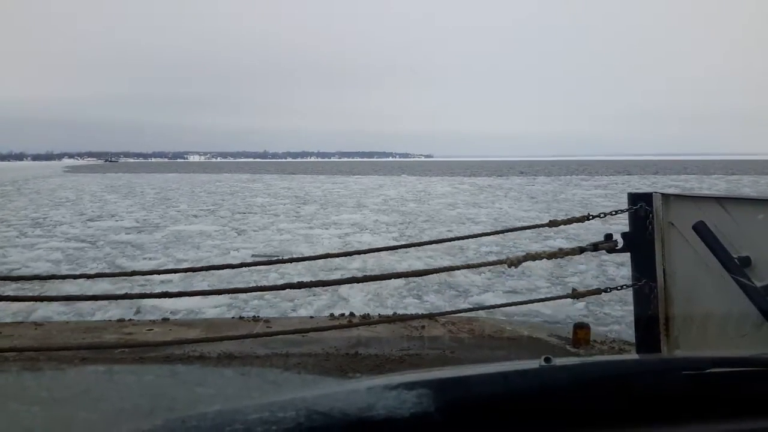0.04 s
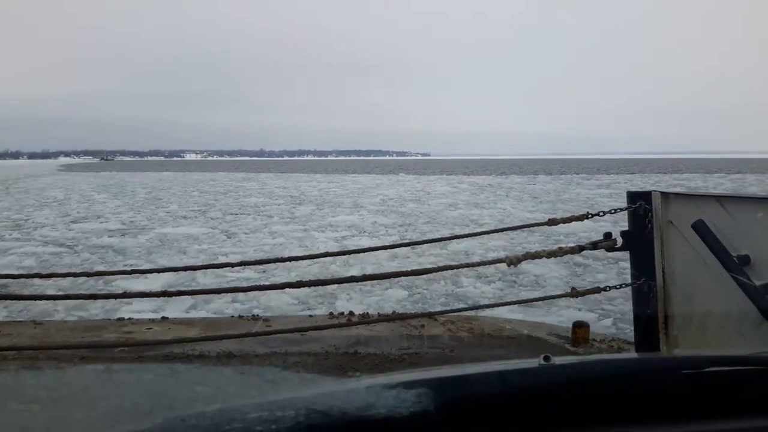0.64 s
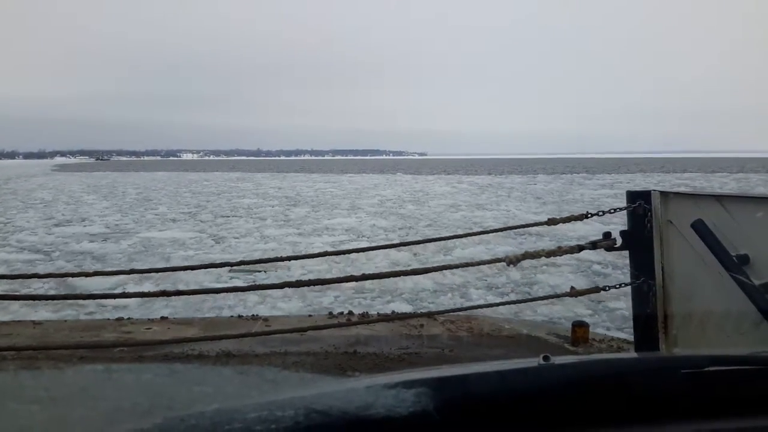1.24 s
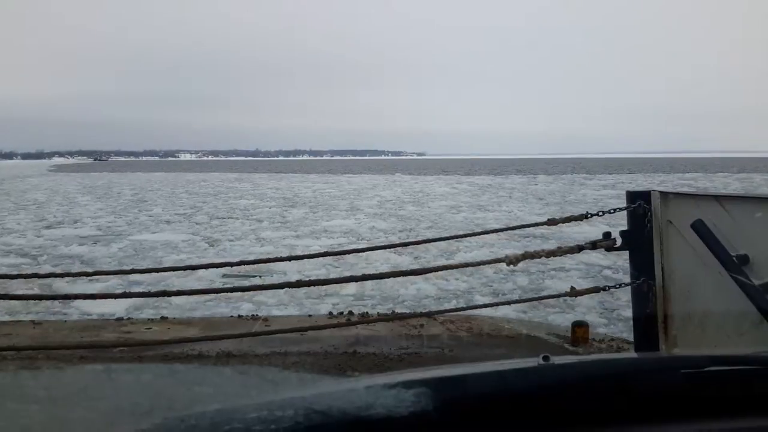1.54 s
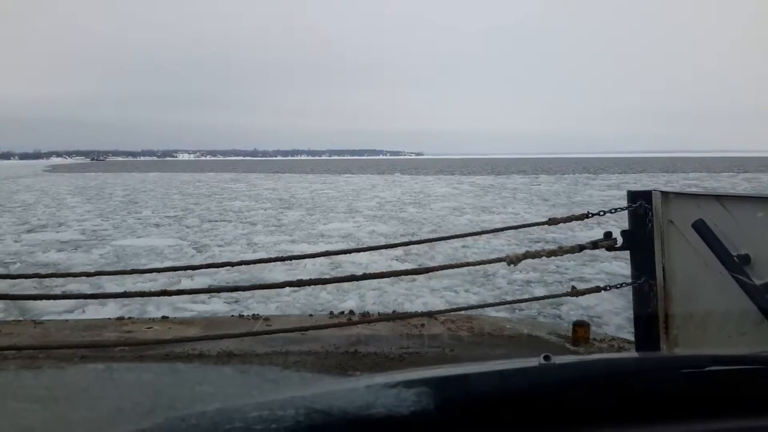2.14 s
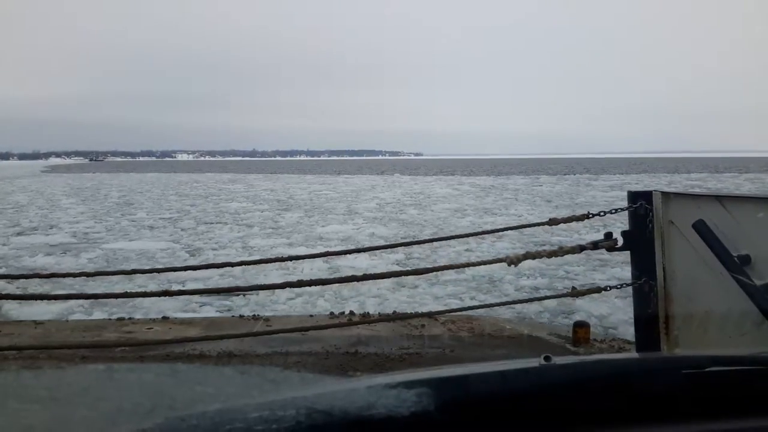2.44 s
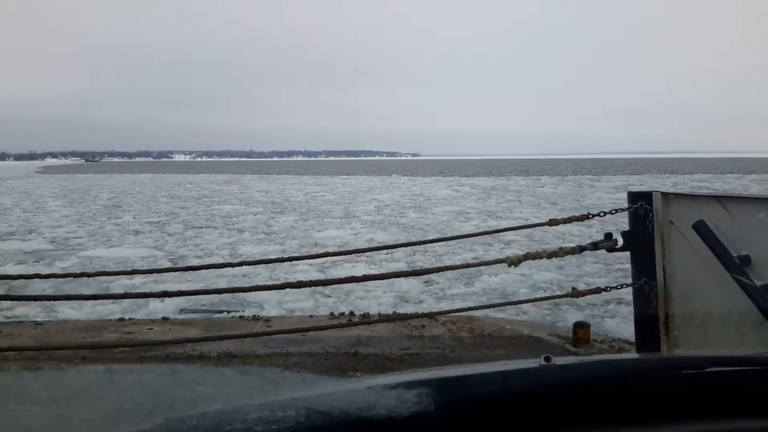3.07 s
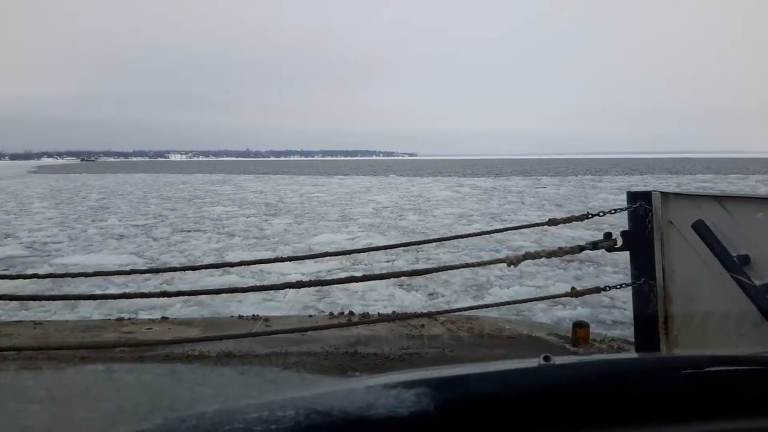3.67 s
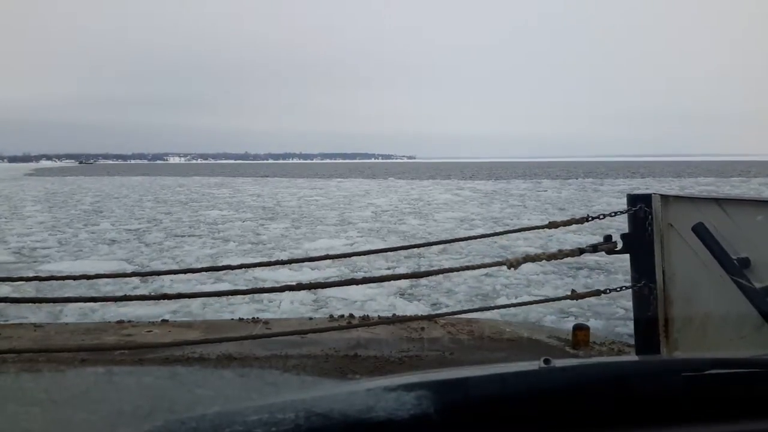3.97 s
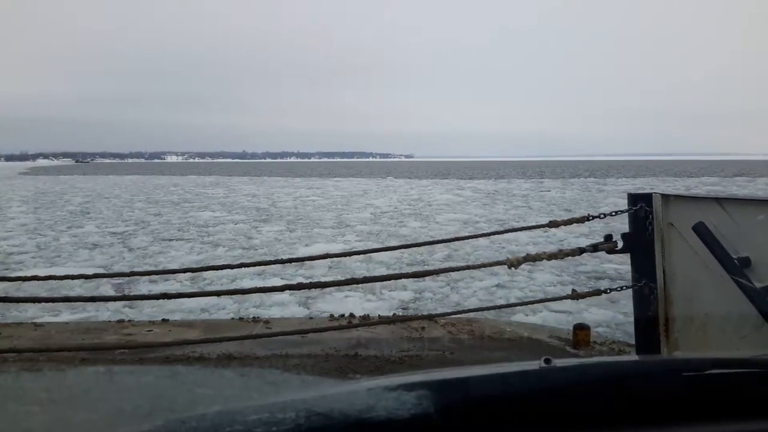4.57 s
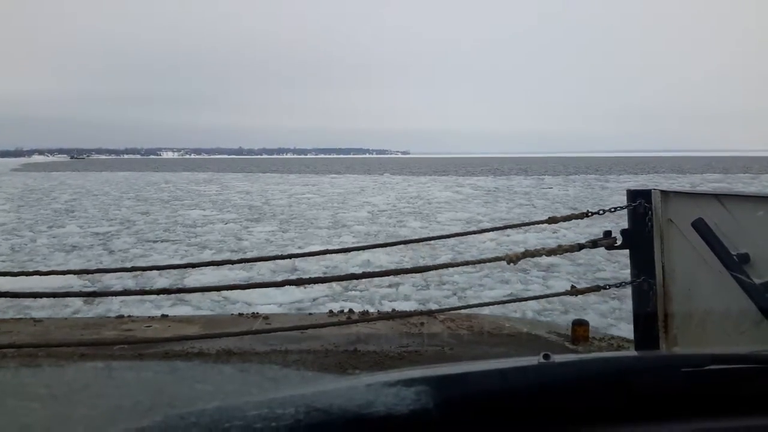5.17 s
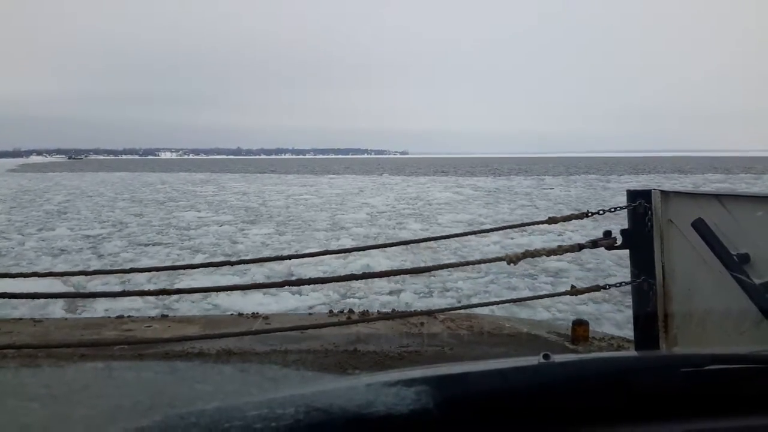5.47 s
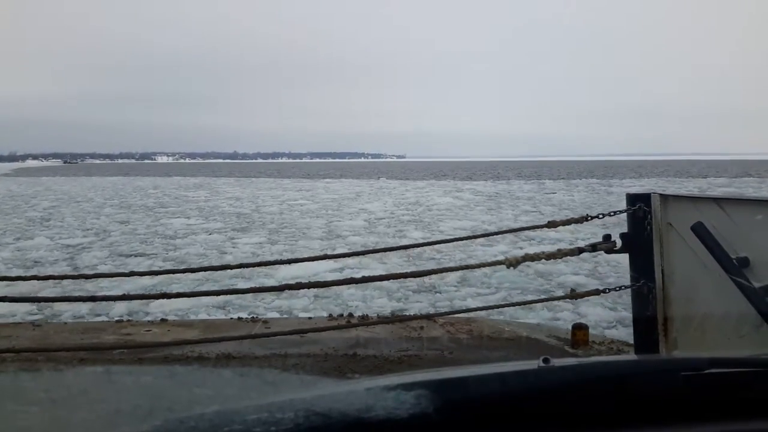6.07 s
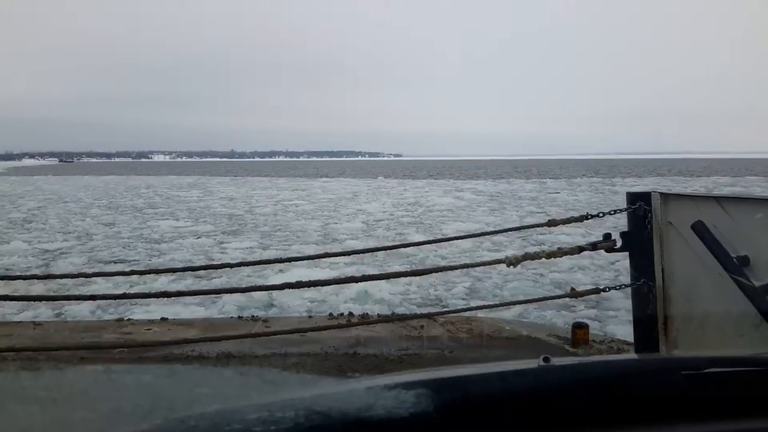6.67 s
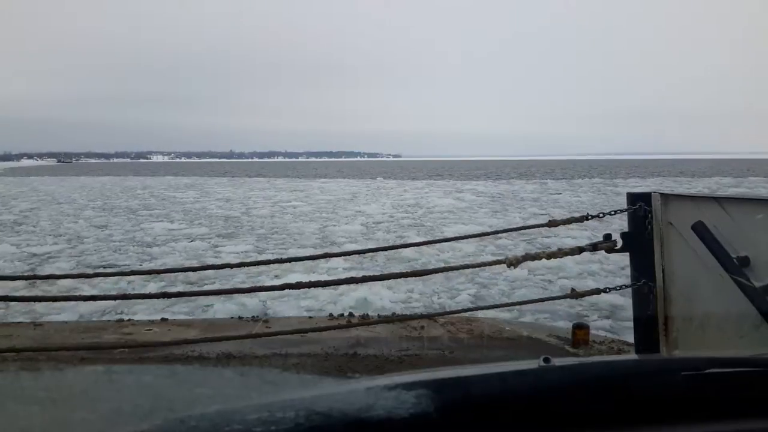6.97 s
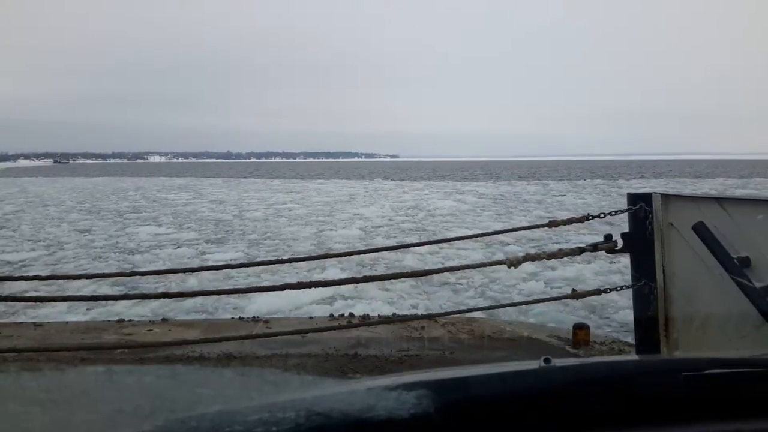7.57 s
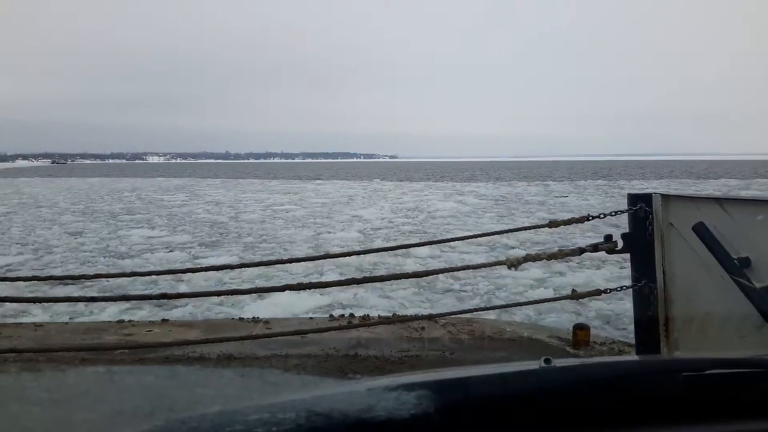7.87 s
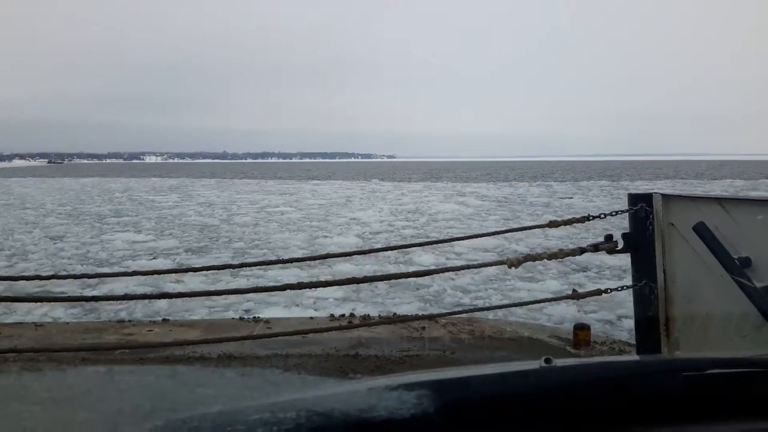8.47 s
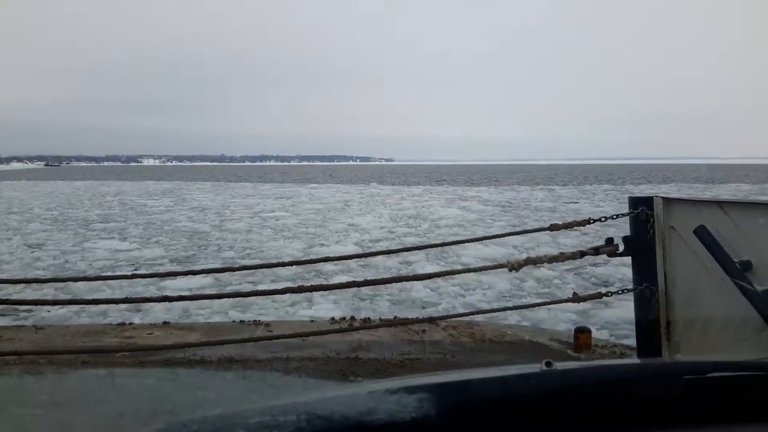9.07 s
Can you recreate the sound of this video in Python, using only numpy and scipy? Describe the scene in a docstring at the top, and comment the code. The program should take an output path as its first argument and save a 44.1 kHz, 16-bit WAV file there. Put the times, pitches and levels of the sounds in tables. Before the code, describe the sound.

From inside a car on a ferry's deck, a low diesel drone shakes the hull, swelling into heavy booms when the propeller works hard. Quieter, muffled ice sloshes and crunches the whole time. Short scrapes and small cracks against the bow cluster in the first third, thin out, then return in the second half as the engine throbs hardest. A faint high hiss occasionally rises to a fizz.

```python
"""A car ferry's diesel drive booms and throbs as it pushes through broken ice, heard in a car on deck.
The engine's firings shake the steel hull, and the boom surges when the propeller works hard.
Floating slabs of ice (floes) churn in the water, scrape along the bow and crack, dulled by the
car windows. A thin, high hiss lies on top and swells a few times."""
import sys
import numpy as np
from scipy import signal
from scipy.fft import rfft, irfft, next_fast_len
from scipy.io import wavfile
from scipy.ndimage import uniform_filter1d

SR = 44100
rng = np.random.default_rng(int(sys.argv[2]) if len(sys.argv) > 2 else 0)


def store_wav(level_fs):
    """Save 16-bit WAV to argv[1]."""
    pcm = np.round(np.clip(np.atleast_2d(level_fs), -1, 1) * 32767)
    wavfile.write(sys.argv[1], SR, pcm.T.astype(np.int16))


N = 411012
T = np.arange(N) / SR


def gain(db):
    """Turn decibels into a number to multiply a sound by."""
    return 10 ** (np.asarray(db) / 20)


def normalise(x):
    """Scale a signal to an average strength (rms) of 1."""
    return x / np.sqrt(np.mean(x ** 2))


def curve(points):
    """Join (time_s, value) points with straight lines."""
    return np.interp(T, *np.transpose(points))


def bump(middle_s, length_s):
    """Rise smoothly to 1 at a chosen moment, then fall again."""
    return np.exp(-2 * np.minimum(((T - middle_s) / length_s) ** 2, 20))


def wobble(per_s):
    """Drift smoothly between random values, mostly from -1 to 1."""
    step = int(SR / per_s)
    held = np.repeat(rng.standard_normal(N // step + 1), step)
    return normalise(uniform_filter1d(uniform_filter1d(held, step), step)[:N])


def clicks(per_s, spread_db):
    """Tiny hits at random times, most weak and a few strong."""
    strength = gain(spread_db * np.minimum(rng.exponential(size=N), 5))
    hits = rng.random(N) < per_s / SR
    return normalise(hits * strength * rng.choice([-1, 1], N))


def shape_tone(x, tone):
    """Turn each pitch up or down by a (pitch_hz, level_db) table; the result has strength 1."""
    pitch_hz, level_db = np.transpose(tone)
    size = next_fast_len(N)
    hz = np.maximum(np.arange(size // 2 + 1) * SR / size, 1)
    octaves_outside = np.maximum(np.log2(hz / pitch_hz[-1]), 0) + np.maximum(np.log2(pitch_hz[0] / hz), 0)
    change_db = np.interp(np.log(hz), np.log(pitch_hz), level_db) - 40 * octaves_outside
    return normalise(irfft(rfft(x, size) * gain(change_db), size)[:N])


def resonate(x, pitch_hz, sharpness=1.4):
    """Keep a broad band around one pitch, filtering twice; the result has strength 1."""
    b, a = signal.iirpeak(pitch_hz, sharpness, fs=SR)
    return normalise(signal.lfilter(np.convolve(b, b), np.convolve(a, a), x))


# the tone of the whistling hiss, of its fizz and of a wider fizz: pitch_hz, level_db
WHISTLE_TONE = [(3300, -13.5), (4000, -15), (4400, -20.5), (4850, -14.5), (5500, -34), (6100, -23.5),
                (7000, -19), (7600, -13), (8000, -0.5), (8250, 2.5), (8600, -6.5), (9100, -8.5),
                (9700, -17), (10300, -15.5), (11200, -30), (14000, -23.5)]
FIZZ_TONE = [(5800, -30), (7000, -14), (7800, 4.5), (8500, 11.5), (9000, 1.5), (9600, -9), (10400, -7),
             (11200, -32.5), (12500, -35)]
WIDE_FIZZ_TONE = [(6300, -26), (7200, -7), (7900, 2), (9100, 0.5), (9800, -8), (10700, -12), (11500, -24)]
# how loud the whistling hiss is: time_s, level_db
WHISTLE_LEVELS = [(0, -64), (.85, -64.5), (2, -64.5), (2.7, -65), (3.5, -66.5), (4.5, -65), (6.2, -65.5),
                  (6.75, -66.3), (7.4, -65.2), (8.35, -66.5), (8.9, -64.8), (9.32, -66)]
# moments when the hiss swells: middle_s, length_s, level_db, wide_share_db
FIZZ_SWELLS = [(.32, .09, -67, -13), (2.27, 0.24, -58.5, -10), (4.74, 0.17, -57.5, -10),
               (4.978, 0.13, -61.5, -7), (5.3, 0.29, -60.5, -3.5), (5.553, 0.16, -66.5, -4),
               (7.33, .15, -65, -14)]


def hiss(ragged_db=0.7):
    """A thin, whistling hiss broadens into a ragged fizz when it swells."""
    whistle = shape_tone(rng.standard_normal(N), WHISTLE_TONE)
    whistle *= gain(curve(WHISTLE_LEVELS) + 0.35 * wobble(9.2))
    fizz = shape_tone(clicks(per_s=7800, spread_db=2.5), FIZZ_TONE)
    wide_fizz = shape_tone(clicks(per_s=7800, spread_db=2.0), WIDE_FIZZ_TONE)
    swells = sum(gain(level_db) * bump(middle_s, length_s) * (fizz + gain(wide_share_db) * wide_fizz)
                 for middle_s, length_s, level_db, wide_share_db in FIZZ_SWELLS)
    return whistle + swells * gain(ragged_db * wobble(25))


# the notes of the steel plates at the ship's front: pitch_hz, width_hz, level_db
PLATE_NOTES = [(347.7, 9.1, -7), (379.7, 9.2, -5.5), (480.5, 12, -8), (590, 34, -9.5), (738, 16, -5),
               (866, 39, -7.5), (944, 34, -7.5), (1007, 25, -5.5), (1110, 24, -8.5)]


def bow_plates(push):
    """Ice rubs the steel plates, and they add their ringing to its sound."""
    ringing = np.zeros(N)
    for pitch_hz, width_hz, level_db in PLATE_NOTES:
        b, a = signal.iirpeak(pitch_hz, pitch_hz / width_hz, fs=SR)
        ringing += gain(level_db) * signal.lfilter(b, a, push)
    return push + ringing


# the tone of churning water and of crunching ice, heard through glass: pitch_hz, level_db
CHURN_TONE = [(150, -17.5), (270, -3), (320, -1.5), (365, 0), (440, -6), (540, -8), (680, -12), (800, -15),
              (1020, -16.5), (1280, -17), (1600, -30.5), (2000, -42), (3000, -60.5)]
CRUNCH_TONE = [(700, -11.5), (1400, 3), (1850, -2.5), (2100, 1), (2380, 2), (2700, -3.5), (3000, -6.5),
               (3600, -19.5), (4000, -24.5), (4400, -30), (4850, -26.5), (5500, -44), (7000, -32),
               (14000, -45)]
# floes rolling over in the bow wave, and lulls between them: middle_s, length_s, change_db
ROLLS_AND_LULLS = [(0.102, 0.17, 2.3), (.38, .14, -1.7), (.8, 0.11, -2), (1.01, .12, .5), (2.6, .45, 0.2),
                   (4.63, .33, 1.3), (5.002, .053, 1), (5.3, 0.065, 1), (5.643, .099, 2.5),
                   (5.85, .15, -0.5), (6.411, .09, 1.5), (6.8, .09, -0.5), (7.33, 0.17, 2),
                   (7.738, .12, -2.6), (7.979, 0.16, 2.4), (8.42, .1, -2), (8.869, 0.11, -0.8)]


def churning_ice(churn_fade_db_per_s=0.3144, crunch_fade_db_per_s=0.42):
    """Floes jostle in the water and their edges crumble; both sounds fade slowly as the ice thins."""
    roll_db = sum(change_db * bump(middle_s, length_s) for middle_s, length_s, change_db in ROLLS_AND_LULLS)
    roll_db += 0.3 * wobble(5.5)
    churn_db = -35.5 - churn_fade_db_per_s * T + roll_db + 0.57 * wobble(18)
    crunch_db = -54 - crunch_fade_db_per_s * T + 0.5 * roll_db + 0.75 * wobble(22)
    jostle = clicks(per_s=1500, spread_db=1.0) + rng.standard_normal(N)
    crumble = clicks(per_s=1400, spread_db=1.1) * gain(1.1 * wobble(30)) + rng.standard_normal(N)
    churn = shape_tone(bow_plates(jostle), CHURN_TONE) * gain(churn_db)
    crunch = shape_tone(crumble, CRUNCH_TONE) * gain(crunch_db)
    return churn + crunch


# the tone of a hard ice edge rasping on steel: pitch_hz, level_db
RASP_TONE = [(900, -4), (1400, 0.5), (1850, -6), (2350, 6), (2800, -4), (3600, -20.5), (5000, -31.5)]
# floes scraping the bow: middle_s, length_s, level_db, pitch_hz, rasp_share_db
FLOE_SCRAPES = [(0.133, 0.12, -49, 1160, -9), (.6, .06, -52, 1100, -9), (1.03, .09, -45.5, 890, -14),
                (1.15, 0.056, -55.5, 1400, -1), (1.354, 0.049, -54.5, 1460, 0),
                (1.69, .085, -43, 980, -6.5), (1.86, .1, -44, 720, -11), (2.2, .097, -54, 1190, -13),
                (2.718, .13, -58, 1490, -8.5), (2.92, 0.068, -52, 1150, -8), (4.313, .06, -49, 1050, -11),
                (4.37, .08, -40, 320, -26), (4.5, .15, -56, 1350, -5.5), (4.7, .2, -54, 1080, -9),
                (5.637, 0.12, -51.5, 1140, -5), (6.18, .07, -49.5, 1080, -11), (6.33, .08, -42, 950, -19),
                (6.41, .06, -38, 470, -26), (6.995, .1, -49.5, 1098, -9), (7.248, .052, -41, 694, -17),
                (7.392, .09, -55, 1400, -5.5), (7.941, .087, -50, 1000, -6), (8.13, .18, -41, 350, -26),
                (8.198, 0.046, -55, 1000, -13), (8.652, 0.047, -52.5, 1290, -12),
                (8.98, .12, -58, 1370, -6)]


def scraping_ice():
    """A floe sticks and slips along the plates. Its size sets the pitch; hard edges add a bright rasp."""
    slips = clicks(per_s=1500, spread_db=1.0)
    ringing = bow_plates(slips)
    rasp = shape_tone(slips, RASP_TONE)
    out = np.zeros(N)
    for middle_s, length_s, level_db, pitch_hz, rasp_share_db in FLOE_SCRAPES:
        grinding = resonate(ringing, pitch_hz) + gain(rasp_share_db) * rasp
        out += gain(level_db) * bump(middle_s, length_s) * grinding
    return out


# slabs breaking against the hull: start_s, fade_s, level_db, pitch_hz
SLAB_CRACKS = [(.205, .02, -52, 2300), (.915, .028, -55, 2600), (.947, .022, -44, 900),
               (1.052, .025, -41, 750), (1.124, .035, -54, 2600), (1.335, .022, -53, 2500),
               (1.37, .013, -54, 2170), (1.662, .05, -50, 2250), (1.674, .04, -40, 980),
               (1.812, 0.022, -53, 2200), (2.14, .022, -51.5, 2500), (2.5, 0.033, -51, 2300),
               (2.655, .022, -52, 2500), (2.775, .033, -53, 1790), (2.878, 0.016, -49, 2400),
               (5.595, .02, -53, 2300), (5.652, .03, -55, 1990), (6.868, .015, -52.5, 2510),
               (7.205, .019, -54, 2700), (7.312, .025, -54, 2003), (7.905, .04, -48, 850),
               (7.98, 0.023, -54, 2590), (8.128, 0.011, -43, 1000), (9.157, .012, -51, 2590),
               (9.175, .02, -47, 1006)]


def cracking_ice(rise_s=0.003):
    """A slab snaps in a quick run of tiny breaks that dies away; big slabs sound low."""
    breaks = clicks(per_s=2000, spread_db=1.0)
    out = np.zeros(N)
    for start_s, fade_s, level_db, pitch_hz in SLAB_CRACKS:
        span = (T >= start_s) & (T < start_s + 10 * fade_s)
        age_s = T[span] - start_s
        loudness = np.minimum(age_s / rise_s, np.exp((rise_s - age_s) / fade_s))
        out[span] += gain(level_db) * loudness * resonate(breaks[span], pitch_hz)
    return out


def car_windows(x, cutoff_hz=2850):
    """The glass lets low sounds in and blocks high ones."""
    return signal.sosfilt(signal.butter(10, cutoff_hz, fs=SR, output="sos"), x)


# the diesel engine's hums: pitch_hz, level_db, drift_hz
ENGINE_HUMS = [(60.4, -42, 0.23), (96.7, -41, 1.8), (130.4, -39.5, 2.2), (151, -40.5, 1.8), (316, -53, 1.5)]


def engine_hum(waver_db=2.0):
    """The engine's lowest hum nearly holds its pitch while the higher ones drift; all waver in loudness."""
    out = np.zeros(N)
    for pitch_hz, level_db, drift_hz in ENGINE_HUMS:
        turns = rng.random() + np.cumsum(pitch_hz + drift_hz * wobble(7)) / SR
        out += np.sqrt(2) * gain(level_db + waver_db * wobble(12)) * np.sin(2 * np.pi * turns)
    return out


def diesel_knocks(cylinders=12, cycles_per_s=10.07, uneven_db=3, scatter_db=0.4):
    """The cylinders fire in turn, some harder than others, in a pattern that repeats every cycle."""
    firings_per_s = cylinders * cycles_per_s * (1 + 0.002 * wobble(1.5))
    firings_so_far = np.floor(np.cumsum(firings_per_s) / SR)
    fire_at = np.flatnonzero(np.diff(firings_so_far))
    cylinder_db = uneven_db * normalise(rng.standard_normal(cylinders))
    pattern_db = cylinder_db[np.arange(len(fire_at)) % cylinders]
    force = gain(pattern_db + scatter_db * rng.standard_normal(len(fire_at)))
    knocks = np.zeros(N)
    knocks[fire_at] = force - force.mean()  # only the unevenness rocks the engine's mounts
    return normalise(knocks)


# how well the hull and the car body pass each pitch: pitch_hz, level_db
HULL_TONE = [(20, -43.5), (35, -28), (52, -19), (66, -4), (77, -6.5), (83, 0), (93, -11.5), (106, 0.5),
             (130, 3.5), (160, -4), (190, -5.5), (200, -10), (218, -7), (250, -8), (285, -18), (450, -32.5)]
# the rumble from the slowly changing load on the hull: time_s, level_db
RUMBLE_LEVELS = [(0, -25), (2.05, -26.5), (2.6, -22.5), (3.25, -27), (4.5, -26.3), (5.2, -27.4),
                 (6.7, -27.6), (9.32, -28)]
# floes shoving the hull: middle_s, length_s, level_db
FLOE_SHOVES = [(.58, 0.14, -28.5), (.83, 0.037, -24.5), (1.1, .056, -23.5), (1.29, .086, -24),
               (1.65, 0.077, -26), (1.88, .07, -23), (2.27, .1, -26.5), (2.69, 0.046, -25.5),
               (2.83, 0.066, -24.5), (4.37, .11, -26.5), (7.3, 0.12, -25), (7.58, .12, -26.5),
               (7.95, 0.07, -23.5), (8.71, .053, -23.5), (9.03, 0.062, -25)]


def hull_rumble(knock_share_db=-6, flutter_db=0.5):
    """Engine knocks and water stirred by the propeller shake the deck, more so when a floe shoves."""
    steady = gain(curve(RUMBLE_LEVELS) + flutter_db * wobble(9.6))
    shove_power = sum((gain(level_db) * bump(middle_s, length_s)) ** 2
                      for middle_s, length_s, level_db in FLOE_SHOVES)
    knocks = gain(knock_share_db) * diesel_knocks()
    water = rng.standard_normal(N)
    return shape_tone(knocks + water, HULL_TONE) * np.sqrt(steady ** 2 + shove_power)


# the drive's deep note, wandering slightly in pitch: time_s, pitch_hz
DRIVE_PITCH = [(0, 93.1), (1.3, 92.34), (1.85, 91.16), (2.4, 94.1), (2.57, 90.65), (2.75, 92.1),
               (3.23, 90.6), (4, 94.3), (4.7, 92.9), (5.8, 94.26), (6.4, 93.7), (7.15, 93.6), (7.6, 92.3),
               (9.3, 92.56)]
# surges when the propeller works hard: start_s, length_s, level_db
DRIVE_SURGES = [(.005, 0.16, -23), (0.458, 0.11, -28.5), (1.1, 0.44, -27.5), (1.602, 0.4, -27.5),
                (2.341, 0.1, -20), (2.53, 0.079, -17), (2.648, .13, -23.5), (2.887, 0.19, -21),
                (3.13, 0.17, -29.5), (3.597, 0.077, -27), (4.583, 0.16, -25.5), (5.248, 0.17, -28.5),
                (5.579, .12, -23), (5.738, .07, -21), (5.849, .13, -23), (6.104, .15, -20.3),
                (6.374, 0.22, -20.3), (6.613, .15, -17.3), (6.885, 0.18, -20), (7.12, .1, -18),
                (7.42, .41, -22), (8.007, 0.073, -23.5), (8.638, 0.1, -24)]


def drive_boom(rest_db=-32, throb_db=2.5, shudder_db=1.1, rise_s=0.046, fall_s=0.06):
    """The drive's deep note throbs inside the car and surges under load."""
    surges = np.zeros(N)
    for start_s, length_s, level_db in DRIVE_SURGES:
        ramps = np.minimum((T - start_s) / rise_s, (start_s + length_s - T) / fall_s)
        surges += gain(level_db) * np.clip(ramps + 0.5, 0, 1)
    throb = gain(rest_db + throb_db * wobble(16))
    strength = np.hypot(throb, surges) * gain(shudder_db * wobble(35))
    # strong throbs hold their pitch; weak ones blur into the rumble
    blur_hz = 5 / (1 + (strength / gain(-26)) ** 2)
    phase = 2 * np.pi * np.cumsum(curve(DRIVE_PITCH) + blur_hz * wobble(14)) / SR
    faint_octave = gain(-24) * np.sin(2 * phase)
    return np.sqrt(2) * strength * (np.sin(phase) + faint_octave)


# moments when the engine sound dips briefly: middle_s, length_s, change_db
ENGINE_DIPS = [(.24, .08, -1), (.42, .07, -2.5), (1.198, 0.026, -7), (1.48, 0.066, -3), (2.02, .06, -1),
               (3.17, .04, -1), (3.97, .05, -2.5), (5.534, 0.029, -4), (5.825, .018, -5), (6.06, .05, -2.5),
               (6.799, 0.04, -3), (7.851, .04, -2), (8.39, 0.051, -1), (8.936, 0.032, -7)]


def scene():
    """The engine, the ice and the hiss as they reach the car seat, in one channel."""
    dip_db = sum(change_db * bump(middle_s, length_s) for middle_s, length_s, change_db in ENGINE_DIPS)
    engine = (hull_rumble() + drive_boom() + engine_hum()) * gain(dip_db)
    ice = churning_ice() + car_windows(scraping_ice() + cracking_ice())
    return (engine + ice + hiss())[None]


def record(dry):
    """Cut off the very highest treble."""
    top_hz = 14500
    return signal.sosfilt(signal.ellip(8, 0.2, 70, top_hz, fs=SR, output="sos"), dry)


dry = scene()
out = record(dry)
store_wav(out)
```